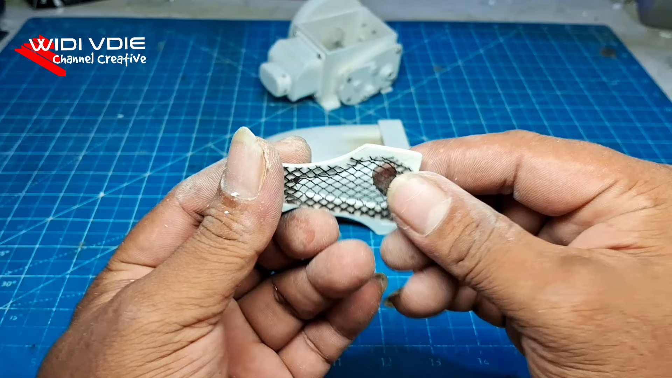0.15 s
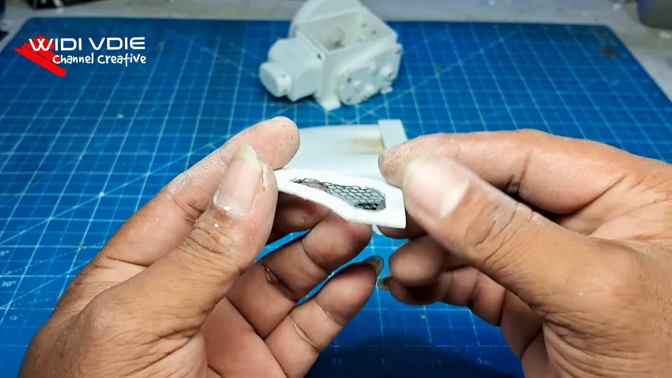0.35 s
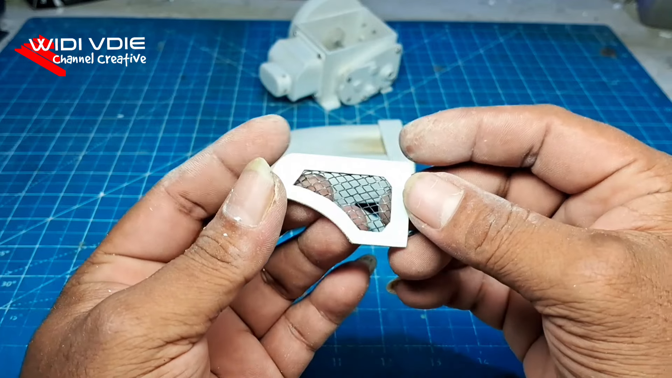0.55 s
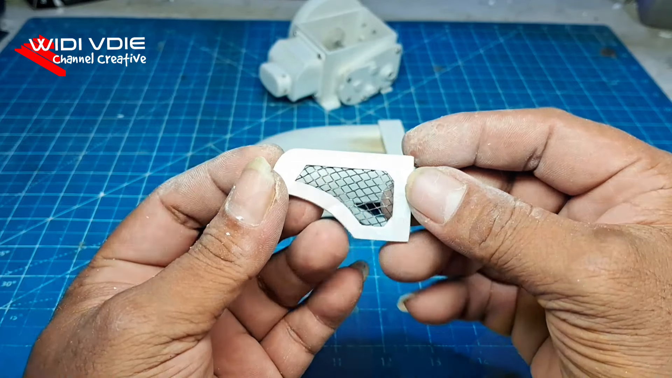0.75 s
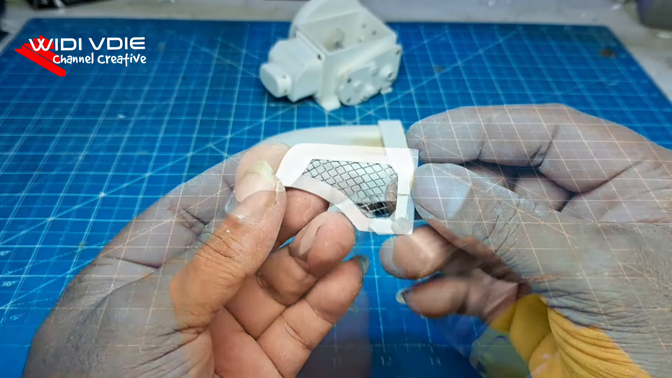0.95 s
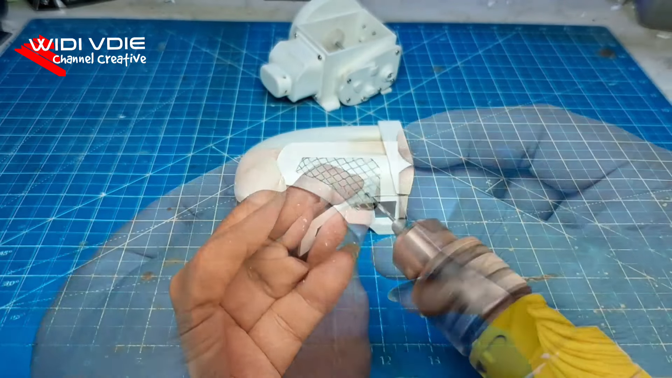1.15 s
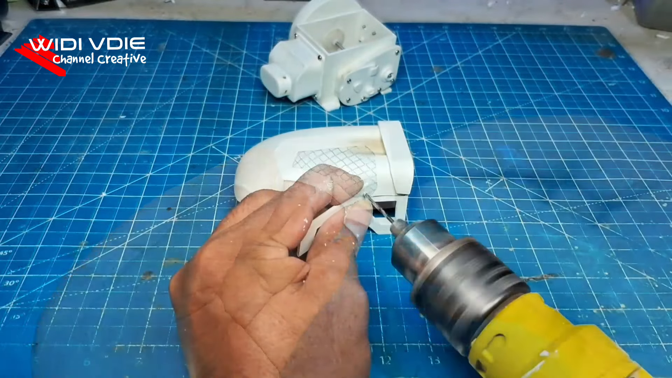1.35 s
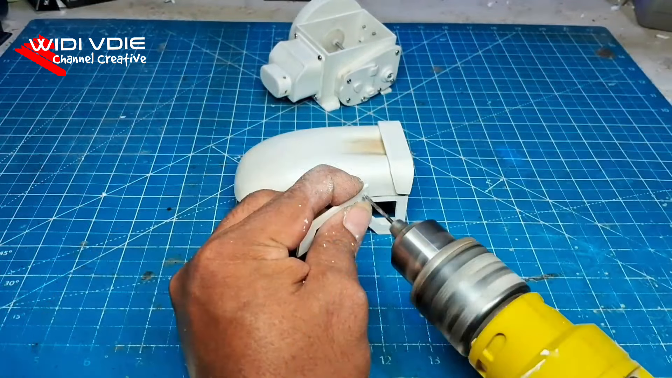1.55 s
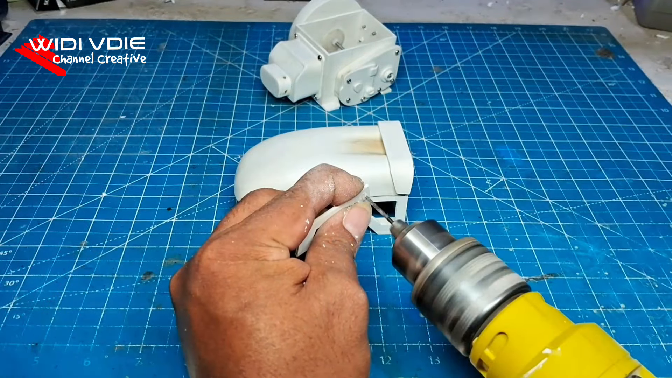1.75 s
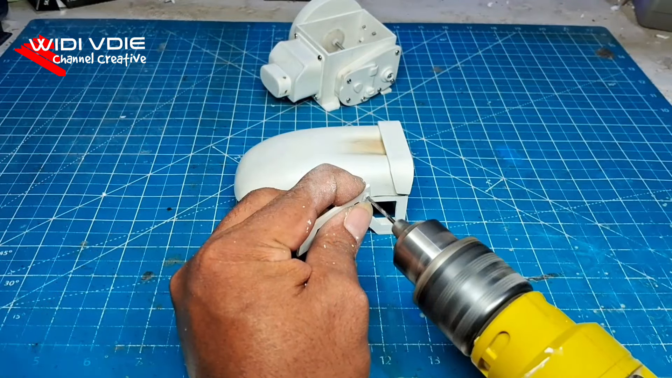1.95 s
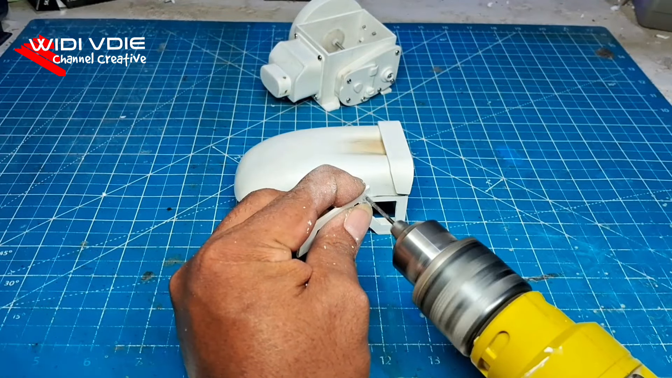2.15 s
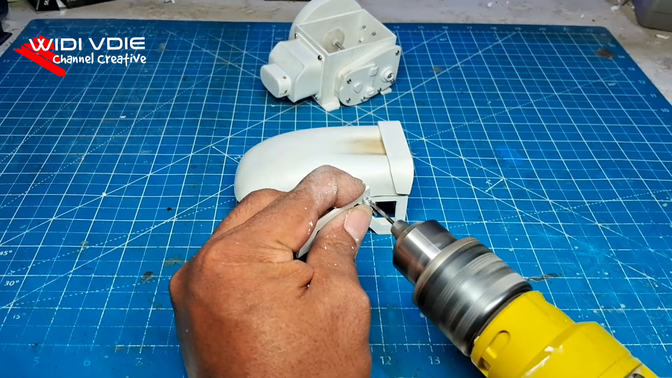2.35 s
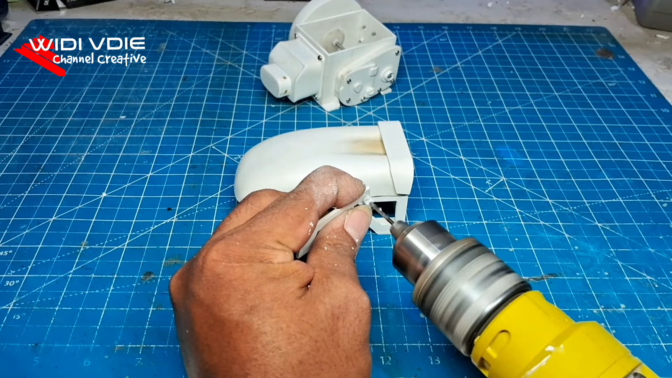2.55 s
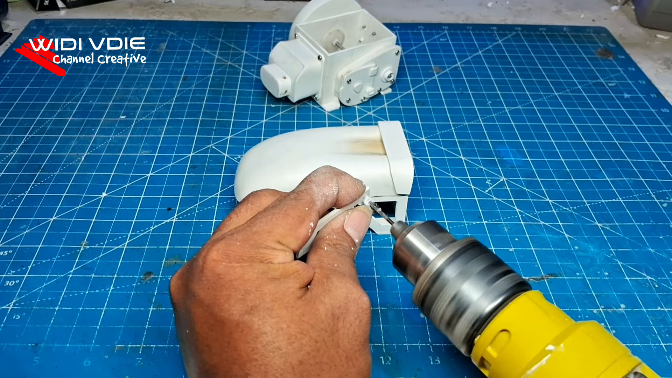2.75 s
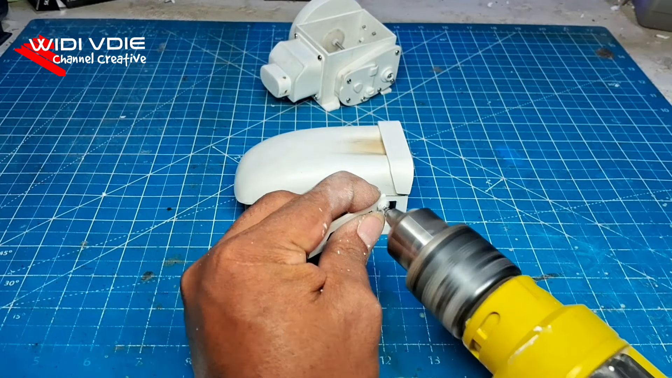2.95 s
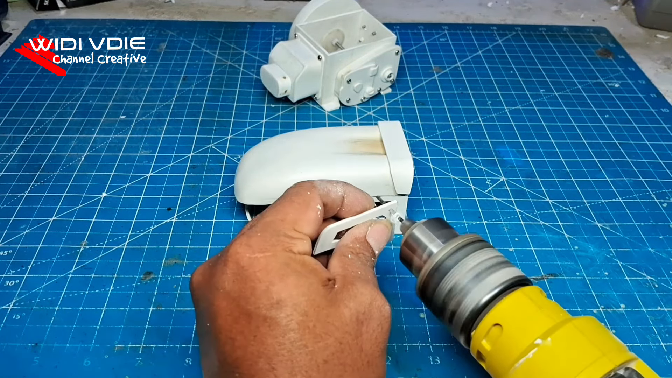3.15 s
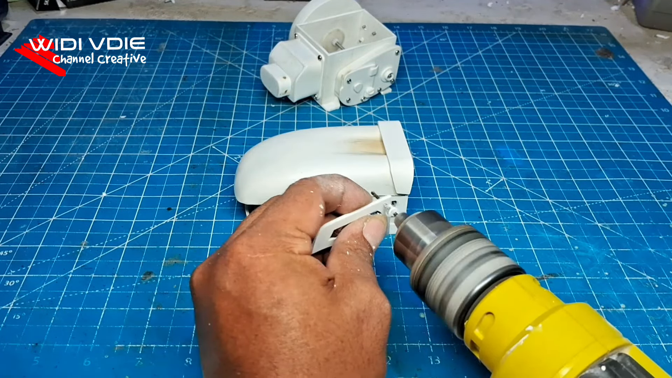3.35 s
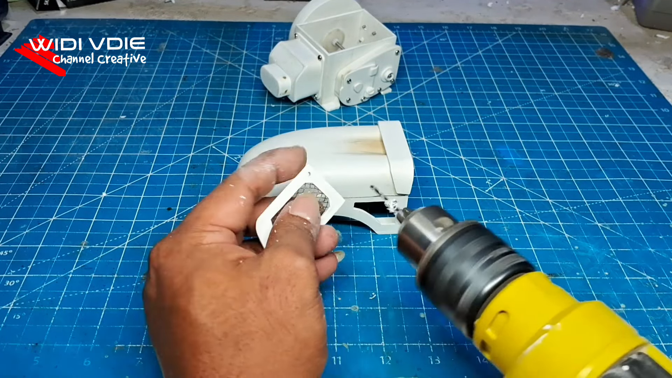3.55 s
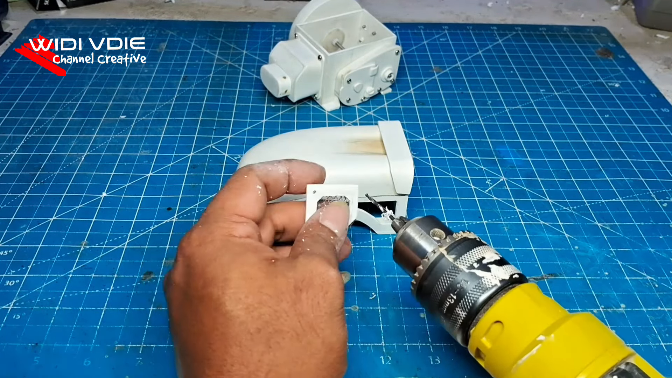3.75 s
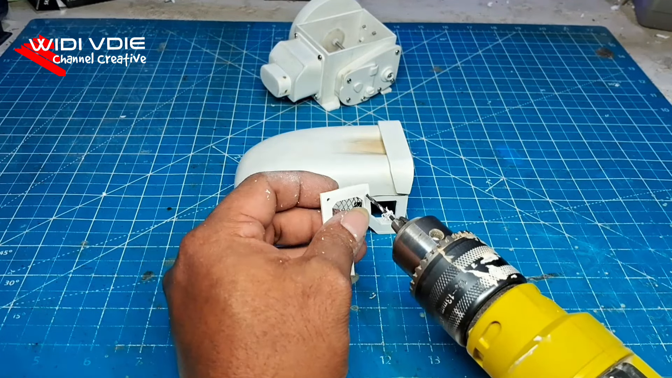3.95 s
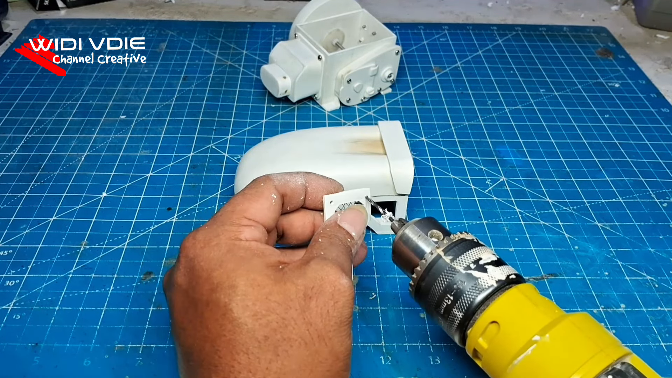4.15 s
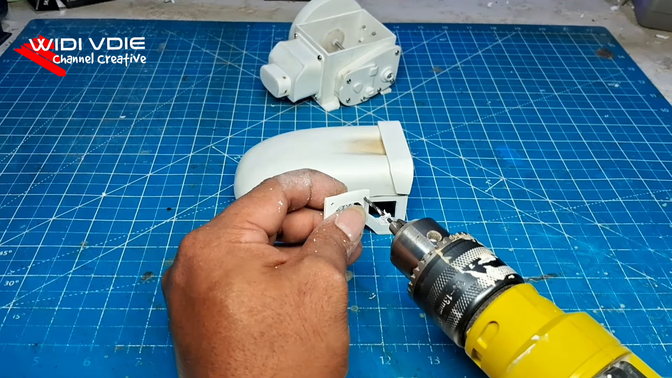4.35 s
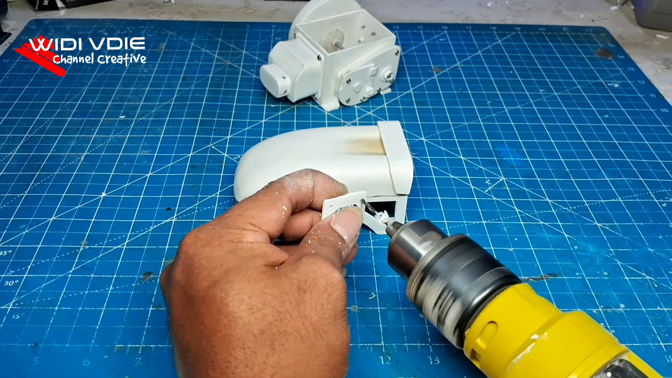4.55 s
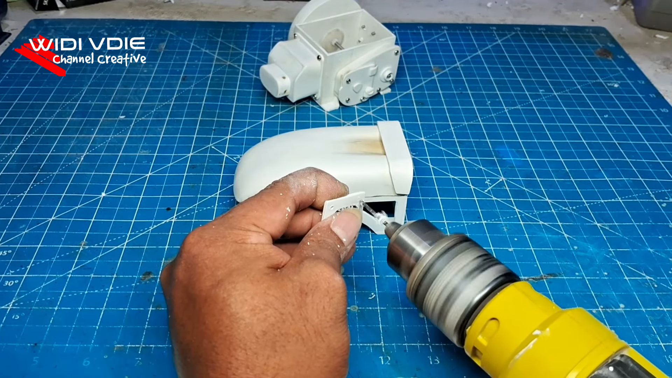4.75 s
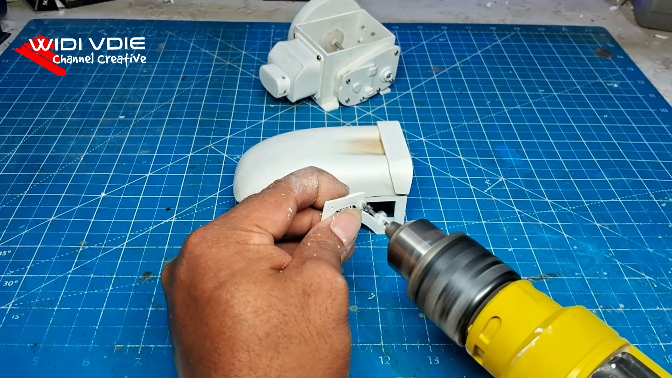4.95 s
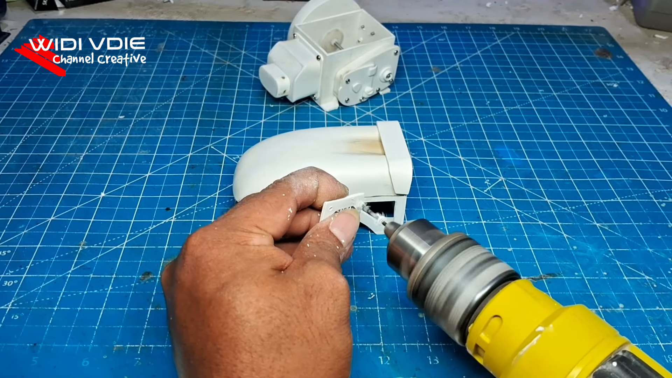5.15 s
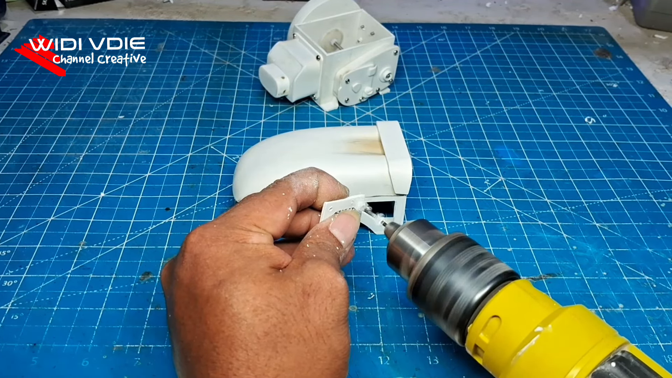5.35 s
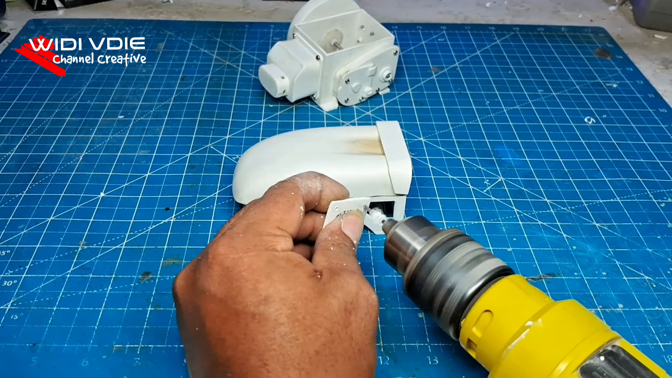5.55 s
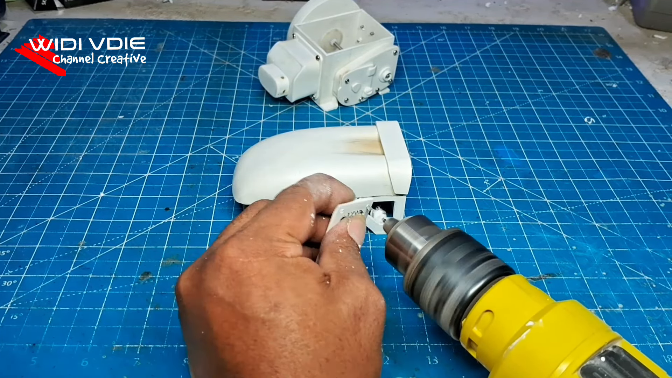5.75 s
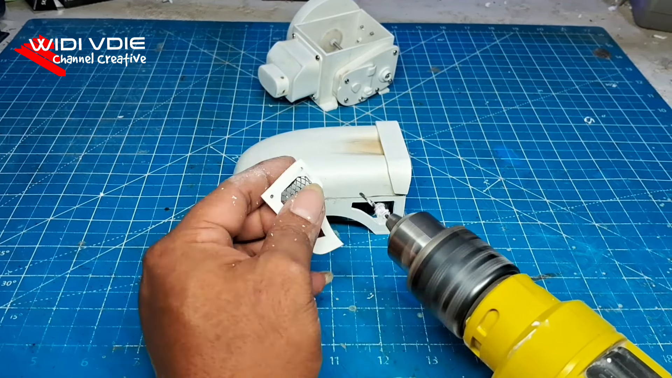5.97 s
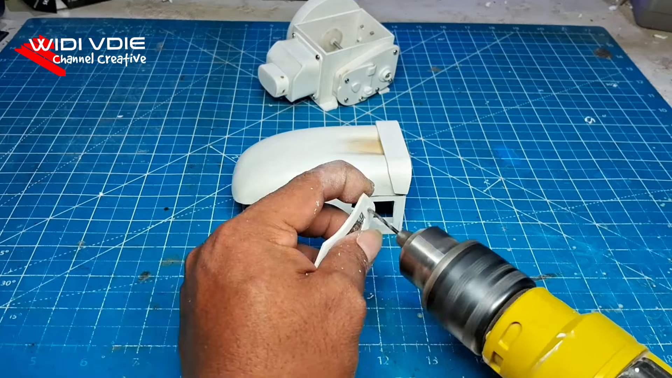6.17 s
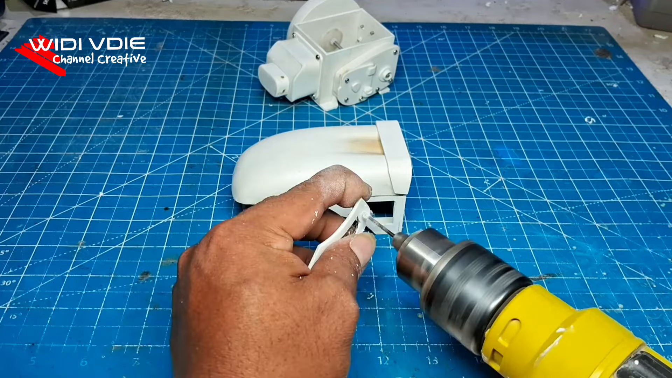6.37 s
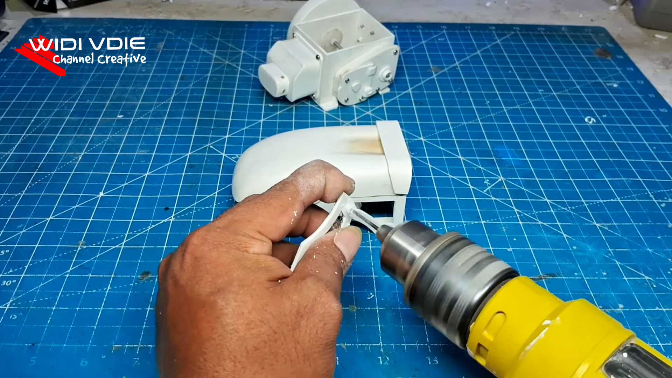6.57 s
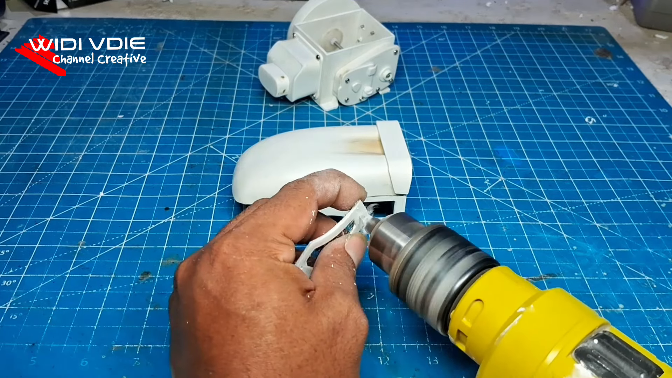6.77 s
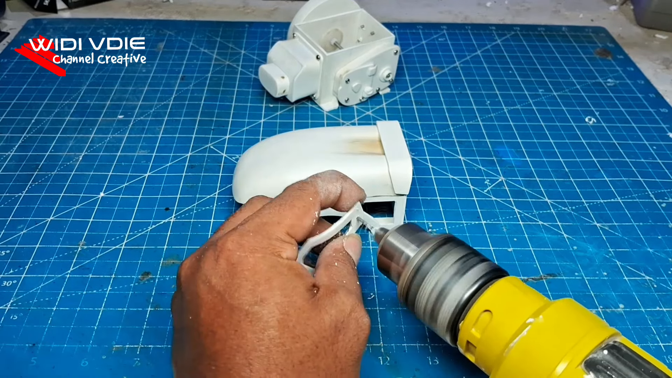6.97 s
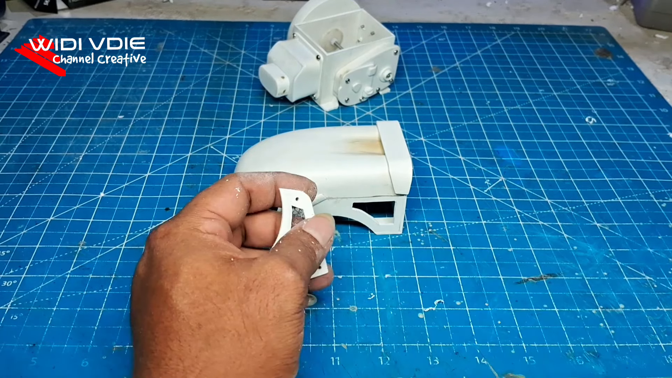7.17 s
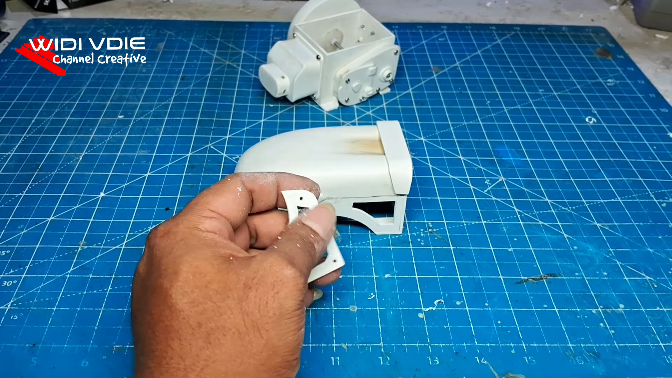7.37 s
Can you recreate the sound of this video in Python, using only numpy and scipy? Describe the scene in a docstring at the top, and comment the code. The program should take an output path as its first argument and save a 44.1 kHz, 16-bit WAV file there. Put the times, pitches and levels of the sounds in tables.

```python
"""At a table with a cutting mat a hand drill bores small plastic parts in three bursts; a far engine idles. The
motor whines on multiples of its shaft speed, the gears rattle in the housing, filtered noise gives rumble,
whirr and fan hiss. Handling adds clicks, table booms and shaking; the whole level dips once. In most of the
third burst drill and engine sound five times fast, their rates and pitches that much higher."""
import sys
import numpy as np
from scipy import signal
from scipy.io import wavfile
from scipy.ndimage import uniform_filter1d

SR = 44100
rng = np.random.default_rng(int(sys.argv[2]) if len(sys.argv) > 2 else 0)


def log_audio(samples):
    """Write samples as a 16-bit WAV file to the path given in sys.argv[1]."""
    # one column per channel
    frames = np.atleast_2d(samples).T
    # limit to full scale, then quantise
    limited = np.clip(frames, -1, 1)
    pcm = np.round(limited * 32767).astype(np.int16)
    wavfile.write(sys.argv[1], SR, pcm)


N = 326781
FAST_START_S, FAST_END_S, PACE = 6.168, 7.197, 5
LAG_SAMPLES = 5  # left ear, at normal pace
CUTOFF_HZ = 15950
REFERENCE_TURNS_PER_S = 180

# Shaft speed goals: quick starts, run-ups, coasting (goal below zero), and a jump to running speed
# where the fast stretch begins. Each row: start in seconds, goal in turns per s before PACE,
# time constant in seconds of the clock that PACE speeds up.
TRIGGER = [(0.712, 14, .004), (0.725, 187.4, .72), (2.816, 184.4, .057), (3.046, 181.4, .02),
           (3.393, -43, .21), (4.54, 36, .003), (4.55, 189.8, .184), (5.375, 184.4, .03),
           (5.538, 191, .056), (5.874, -43, .215), (6.1676, 104.5, .00003), (6.168, 195.8, .61),
           (6.798, 214, 1.4), (7.07, -65, 1.2)]
# Level changes by moment. Each row: time in seconds, dB added to the rumble, to the rattle,
# to the whirr and hiss, to the whine.
LEVEL_CHANGES = [(0.7, 1.1, 0, 2.2, 3.5), (1.5, 3.5, 1, 3.1, -0.7), (1.62, -1, 1.5, 0, -1.5),
                 (2.26, -0.2, 3, 0.1, -1.3), (2.8, 0, -0.7, 1.5, -2.1), (2.95, -8.5, 0, 0.5, 0.5),
                 (3.36, -10.5, -2.5, -2, -1.5), (3.45, 2, -4, -1.4, -2.8), (4.52, -4, -7, -6.5, -8),
                 (4.6, -2.5, 1.5, 4, -7), (4.66, -2, -1.7, 4, -4), (5.0, -5, -3.5, 1, -0.2),
                 (5.25, -3, -2, -2, -0.8), (5.87, -12, -3, -0.1, -0.8), (5.95, -4, 1.5, -0.1, -0.5),
                 (6.1, 3, -1, -0.5, -5), (7.197, 2.5, -3, 2, 6.5), (7.41, 6, -4, 3, 5.5)]
# Whine. Each row: shaft multiple, dB under power at the reference speed, dB coasting at that speed,
# dB gained per doubling of speed.
TONES = [(23, -22, -27, 14), (24, -24.5, -29, -1), (48, -31.5, -35, 3), (72, -27.5, -31, 7),
         (96, -23, -27, 11), (120, -23, -24, 14), (144, -29, -29, 9)]
# Whine let out by the casing. Each row: frequency in Hz, gain in dB.
CASING = [(900, -45), (1800, -22), (2200, -11), (2600, 1), (3800, 0), (4400, 4), (5000, 6), (6400, 0),
          (7200, 5), (8000, 0), (8900, 6), (9900, -1), (11000, 2), (12200, -1), (13500, 4), (15900, 2)]
# Weaker multiples. Each row: shaft multiple, index of the level column it follows.
SIDEBANDS = [(25, 1), (46, 0), (47, 0), (49, 0), (50, 0), (51, 0), (52, 0), (69, 0), (73, 3), (95, 4),
             (168, 6), (192, 6), (12, 0)]
FAST_SIDEBANDS = [(11.5, 0), (12.5, 0), (23, 1)]
# Their levels. Each entry: dB relative to the column followed.
SIDEBANDS_DB = [-12, -8, -17, -14, -16, -17, -17, -14, -11, -11, -2, -3, -19]
FAST_SIDEBANDS_DB = [-3, -2, -5]
# Whine in the fast stretch. Each row: time in seconds, dB of shaft multiples 12, 24 and 2.57.
FAST_SPIN = [(6.168, -45, -23, -48), (6.24, -46, -27, -48), (6.37, -32, -65, -42), (6.57, -29, -65, -32),
             (7.0, -29, -65, -30), (7.08, -35, -45, -31), (7.13, -60, -23, -55), (7.197, -65, -23, -65)]
# Low gear tone at 2.6 times the shaft speed, two spells. Each row: time in seconds, level in dB.
GEAR_TONE = [
    [(2.3, -52), (2.9, -48), (3.39, -49)],
    [(5.0, -50), (5.24, -30.5), (5.32, -50), (5.55, -47), (5.62, -28), (5.87, -30.5)],
]
# Housing resonances. Each row: frequency in Hz and width in Hz before the caller's scaling, relative dB.
HOUSING = [(1427, 43, -8), (1529, 47, -0.5), (1582, 58, 0), (1774, 93, -8)]
# Drill noise by shaft speed. Each row: turns per s, rumble dB, gear rattle dB, whirr dB, fan hiss dB.
POWERED = [(6, -60, -80, -62, -85), (13, -31, -39, -45, -49), (22, -29.5, -42, -35, -48),
           (35, -28, -38, -32.5, -35.5), (60, -26.5, -35, -26.5, -28.5), (91, -26.5, -27, -22, -20),
           (132, -29.5, -22, -19.5, -19.5), (187, -29.5, -21.5, -16, -19.5)]
COASTING = [(14, -70, -90, -85, -90), (24, -60, -69, -71, -60), (38.8, -50, -58, -36, -35),
            (60.4, -43, -41, -25.5, -30), (118, -38, -30.5, -23, -17.5), (190, -25, -19.5, -15.5, -20.5)]
# Drill noise in the fast stretch. Each row: time in seconds, rumble dB, gear rattle dB, whirr dB, hiss dB.
FAST_NOISE = [(6.168, -22.5, -41, -28, -20.5), (6.191, -24, -24, -26, -17.5),
              (6.279, -23, -18, -21.5, -16.5), (6.5, -31.5, -17.5, -23.5, -16),
              (6.87, -31, -17, -21.5, -16.5), (6.99, -28, -18.5, -20, -13.5), (7.085, -31, -17, -24, -18),
              (7.163, -36, -35, -27.5, -22), (7.197, -32, -36, -33, -28)]
# Noise colours. Each row: frequency in Hz, relative density in dB per Hz.
RUMBLE = [(88, -40), (150, -5.5), (254, 0), (432, 1), (476, 6), (619, 1.5), (741, -19.5), (900, -12),
          (1170, -46), (1980, -120)]
WHIRR = [(350, -33), (600, -14.5), (877, -14), (1200, -7.5), (1510, -9), (2040, -7), (3020, -11.5),
         (3470, -6.5), (5070, -8.5), (6230, -12), (8000, -9.5), (10400, -59), (17600, -120)]
HISS = [(3530, -35), (6000, -5), (7470, -7), (8100, -3), (8650, 5), (9530, -1), (13300, 7.5), (15800, -6.5)]
FAST_RUMBLE = [(190, -25), (330, -9), (539, -10), (592, -6), (793, -17), (1040, -8), (1410, -2.5),
               (2500, 5.5), (4000, -3.5), (5200, -33), (8800, -120)]
FAST_WHIRR = [(2060, -26), (3500, 6.5), (3760, -19.5), (4930, 3.5), (5900, -0.5), (7390, -19), (9500, -19),
              (12400, -39), (20900, -120)]
FAST_HISS = [(5000, -18), (8500, 12.5), (9410, -6), (12700, 3.5), (14000, -3), (15200, -5), (15800, -19)]
SHAKE_COLOUR = [(30, -30), (44, -9), (52, -13), (95, 3), (150, 0.5), (200, -16)]
AIR = [(82, -44), (140, -9.5), (269, -22), (315, -13), (334, -19.5), (407, -7), (468, -13.5), (538, -11.5),
       (630, -23.5), (1210, -24.5), (1310, -26), (1420, -23), (2320, -24.5), (2570, -21.5), (15800, -53.5)]
# Stereo noise. Each row: frequency in Hz, left-right likeness.
LIKENESS = [(60, .05), (150, 0.47), (300, 1), (1000, 0.19), (3000, 0.059), (8000, 0.064), (15000, 0.11)]
# Stereo noise. Each row: frequency in Hz, left minus right in dB.
LEAN = [(60, -5), (150, -1), (380, -2), (950, 0.5), (2380, -2.5), (5980, -0.5), (15000, -7)]
# Trigger and part clicks. Each row: start in seconds, crack peak in dB, dullness 0-1.
CLICKS = [(0.757, -17, .1), (1.098, -11, .6), (3.6983, -40, .9), (4.4144, -21, .5), (4.548, -26, .3),
          (7.2525, -16, .6), (7.3047, -13, .5), (7.3563, -9, .6), (7.3876, -7.5, .65)]
# Ringing plastic. Each row: frequency in Hz, relative dB, 60 dB decay in seconds.
PLASTIC = [(650, -16.5, .03), (1420, -18.5, 0.066), (1600, 3, 0.039), (3273, -6, .015), (4786, -12, .012),
           (6200, -8, 0.012), (7600, 3, .01)]
# Bumps on the table. Each row: start in seconds, level in dB, lower pitch in Hz,
# 60 dB decay in seconds for a 120 Hz boom (shorter in proportion for higher pitch).
BUMPS = [(1.269, -23, 94.2, 0.12), (1.359, -10, 238, 0.092), (1.623, -14.5, 97, 0.1),
         (3.422, -2.5, 170, 0.048), (3.439, -15, 125, 0.12), (3.849, -10.5, 148, 0.06),
         (3.911, -13, 133, 0.11), (6.541, -11, 466, 0.062), (6.578, -15, 508, 0.18),
         (7.037, -20, 594, 0.12), (7.059, -16, 460, 0.17)]
# Hands shaking the table. Each row: peak time in seconds, peak dB, rise and fall in seconds per 20 dB.
SHAKE = [(0.0, -39, .1, -2), (1.1, -36, .7, -2), (1.36, -25, 0.2, 0.3), (1.65, -35.5, .3, -0.3),
         (3.09, -40, 0.22, 0.2), (3.45, -36, 0.088, 0.2), (3.88, -27, .07, 0.08), (4.36, -45, .6, 0.1),
         (4.67, -40, .4, .3), (6.02, -46, 0.22, 0), (7.25, -48, .12, .8)]
# Engine cycle rate. Each row: time in seconds, cycles per s before PACE.
CYCLES_PER_S = [(0, 13.14), (2.8, 13.14), (2.85, 13.2), (7.41, 13.2)]
# Engine tones. Each row: multiple of the cycle rate, relative dB.
ENGINE = [(4, -50), (5, -53), (6, -50), (7, -52), (8, -57), (9, -48), (10, -54), (11, -50), (12, -52),
          (13, -46), (14, -49), (15, -48), (16, -43), (17, -51), (18, -51), (19, -43), (20, -44), (21, -60),
          (22, -50), (23, -55), (28, -52), (29, -49), (31, -47), (32, -52), (33, -51), (34, -56), (35, -52),
          (36, -50), (39, -50), (40, -53)]
# Engine and room. Each row: time in seconds, engine level dB, dB added to multiples under 10, room air dB.
IDLE = [(0, 1.5, 0, -36.5), (.7, 1.5, 0, -36.5), (1.2, -0.5, 6, -43), (2.8, -12.5, 9, -43),
        (2.85, -9, -12, -34), (3.4, -11, -14, -45), (3.7, -2.5, -15, -39.5), (4.5, -1, -15, -37.5),
        (4.7, -8, -17, -45.5), (6.16, -4.5, -30, -36.5), (6.17, 3, 0.5, -69), (7.195, 0, -2, -71),
        (7.2, 0.5, 0, -31), (7.41, -3, -3, -38)]
# Dip of the whole level. Entries: start in seconds, starting gain in dB, recovery in seconds.
DROPOUT = (2.7992, -27, 0.018)


def amp(db):
    """dB to gain."""
    return 10 ** (np.asarray(db) / 20)


def rms_one(x):
    """Scaled to rms 1."""
    return x / np.sqrt(np.mean(x ** 2) + 1e-20)


def in_time(tables, silent):
    """Columns of the tables at every sample; the value silent outside them."""
    t = np.arange(N) / SR
    out = np.full((len(tables[0][0]) - 1, N), float(silent))
    for rows in tables:
        s, *columns = np.transpose(rows)
        on = (t >= s[0]) & (t <= s[-1])
        out[:, on] = [np.interp(t[on], s, c) for c in columns]
    return out


def at_hz(points, hz):
    """Two-column table interpolated on a log axis."""
    x, y = np.array(points)[:, 0], np.array(points)[:, 1]
    return np.interp(np.log(hz), np.log(x), y)


def drift(rate_hz):
    """Slow random signal of rms 1: noise at SR / 40 through a two-pole low-pass."""
    r = np.exp(-80 * np.pi * rate_hz / SR)
    white = rng.standard_normal(N // 40 + 2002)
    slow = signal.lfilter([1], [1, -2 * r, r * r], white)[2000:]
    return np.interp(np.arange(N) / 40, np.arange(len(slow)), rms_one(slow))


def ring(x, hz, width_hz):
    """Two-pole resonator: a unit click starts a decaying sine of height 1."""
    r, w = np.exp(-np.pi * width_hz / SR), 2 * np.pi * hz / SR
    return signal.lfilter([0, np.sin(w)], [1, -2 * r * np.cos(w), r * r], x + 1e-18)


def shaft():
    """Speed before PACE, closing in exponentially on each new goal, and smoothed power on/off."""
    t = np.arange(N + 1) / SR
    lived_s = t + (PACE - 1) * np.clip(t - FAST_START_S, 0, FAST_END_S - FAST_START_S)
    speed, powered = np.zeros(N + 1), np.zeros(N + 1, bool)
    starts = [int(s * SR) for s, _, _ in TRIGGER] + [N]
    for (_, goal, lag_s), a, b in zip(TRIGGER, starts, starts[1:]):
        remaining = np.exp((lived_s[a] - lived_s[a:b + 1]) / lag_s)
        speed[a:b + 1] = np.maximum(goal + (speed[a] - goal) * remaining, 0)
        powered[a:b] = goal > 0
    return speed[:N], uniform_filter1d(1. * powered[:N], size=600)


def tone_levels(speed, power):
    """Whine levels in dB: each multiple has its own slope with speed and its own coasting level."""
    _, on_db, off_db, slope_db = np.transpose(TONES)[:, :, None]
    octaves = np.log2((speed + .01) / REFERENCE_TURNS_PER_S)
    level_db = power * on_db + (1 - power) * off_db + slope_db * octaves
    return np.where(speed > 8, level_db, -120)


def whine(turns_per_s, levels_db, multiples, sidebands, sidebands_db, waver_db, sway, casing=None):
    """Sines on shaft multiples; standing waves swing each from side to side, a quarter cycle apart."""
    on = np.flatnonzero(levels_db[0] > -100)
    few = on[::16]  # control points
    turns = np.cumsum(turns_per_s[on] * (1 + .001 * drift(40)[on])) / SR
    lines = [(m, k, 0) for k, m in enumerate(multiples)]
    lines += [(*s, db) for s, db in zip(sidebands, sidebands_db)]
    out = np.zeros((2, N))
    for multiple, column, relative_db in lines:
        hz = multiple * turns_per_s[few]
        casing_db = at_hz(casing, hz) if casing else 0
        line_db = levels_db[column][few] + relative_db + casing_db + waver_db * drift(18)[few]
        level = 2 * amp(line_db) * (hz < CUTOFF_HZ)
        angle = 1.0 + sway * drift(4)[few]
        phase = 2 * np.pi * (multiple * turns + rng.random())
        sides = level * [np.cos(angle), np.sin(angle)]
        left, right = np.repeat(sides, 16, axis=1)[:, :len(on)]
        out[:, on] += [left * np.sin(phase), right * np.cos(phase)]
    return out


def walls(x, echo_db):
    """A few wall echoes, crossing sides; they blur fast glides and let steady tones swell and cancel."""
    out = x.copy()
    for k, lag_s in enumerate([.011, .019, .031, .044, .062]):
        lag = int(lag_s * SR)
        out[:, lag:] += (-1) ** k * amp(echo_db - 90 * lag_s) * x[::-1, :-lag]
    return out


def gear_rattle(level_db, knocks_per_s, pace, spread_db, widen):
    """Loose teeth knock at random and ring the housing; pace scales knock rate, pitch and width."""
    knocking = rng.random(N) < knocks_per_s * pace / SR
    sizes = amp(spread_db * np.minimum(rng.exponential(1, N), 4)) * knocking
    common = sizes * rng.choice([-1, 1], N)
    out = []
    for side in range(2):
        knocks = common + .5 * np.roll(common, 300 + 170 * side)  # table echo, other on each side
        modes = [amp(db) * (-1) ** k * ring(knocks, hz * pace, width_hz * pace * widen)
                 for k, (hz, width_hz, db) in enumerate(HOUSING)]
        out.append(sum(modes))
    return amp(level_db) * rms_one(np.array(out))


def drill_noise(speed, power):
    """Rumble, rattle, whirr and hiss dB follow the speed, one way under power, another coasting."""
    on_db, off_db = [np.array([at_hz(np.array(rows)[:, [0, k]], speed + .01) for k in range(1, 5)])
                     for rows in (POWERED, COASTING)]
    return power * on_db + (1 - power) * off_db


def banded_noise(layers, patchy_db, wobble, pace):
    """Third-octave stereo noise bands, each with the summed power of all (colour, level dB) layers."""
    edges = 40 * 2 ** np.arange(-1 / 3, 9.1, 1 / 3)
    mids, widths = np.sqrt(edges[1:] * edges[:-1]), np.diff(edges)
    white, out, step = rng.standard_normal((2, 2, N)), 0, 32
    shares = []
    for colour, level_db in layers:
        inside = (mids > colour[0][0]) & (mids < 1.2 * colour[-1][0])
        power = amp(2 * at_hz(colour, mids)) * widths * inside
        shares.append(np.outer(power / power.sum(), amp(2 * level_db[::step])))
    gains = np.sqrt(sum(shares))
    for k, hz in enumerate(mids):
        band = signal.butter(2, edges[k:k + 2], "band", fs=SR, output="sos")
        mid, side = signal.sosfilt(band, white[k % 2]) * np.sqrt(SR / 4 / widths[k])
        alike = np.where(pace > 1, *np.clip(at_hz(LIKENESS, [hz / PACE, hz]), 0, 1))
        gain = np.repeat(gains[k], step)[:N] * amp(patchy_db * drift(16.0))
        if hz > 700:
            gain = gain * wobble
        lean = amp(at_hz(LEAN, hz) / 2 * np.array([[1], [-1]]))
        stereo = np.sqrt(1 + alike) * mid + np.sqrt(1 - alike) * side * [[1], [-1]]
        out = out + gain * lean * stereo
    return out


def clicks():
    """A short crack of noise, dulled by a soft contact, plus the ringing of the plastic."""
    hits = np.zeros(N)
    cracks = rng.standard_normal((len(CLICKS), 300)) * np.exp(-np.arange(300) / 110)
    for (s, db, dull), crack in zip(CLICKS, cracks):
        dull = np.clip(dull, 0, .95)
        crack = signal.lfilter([1], [1, -dull], crack)
        hits[int(s * SR):][:300] += amp(db) * crack / np.abs(crack).max()
    rings = sum(amp(db - 29) * ring(hits, hz, np.log(1000) / np.pi / max(t60_s, .005))
                for hz, db, t60_s in PLASTIC)
    return signal.sosfilt(signal.butter(2, 300, "high", fs=SR, output="sos"), hits + rings)


def bumps():
    """Soft pushes set the table top booming on two close pitches."""
    out = np.zeros(N)
    for s, db, hz, decay_s in BUMPS:
        t = np.arange(min(int(.3 * SR), N - int(s * SR))) / SR
        boom = np.sin(2 * np.pi * hz * t) + 0.61 * np.sin(2 * np.pi * 1.29 * hz * t)
        decay = amp(db - 60 * t * hz / 120 / max(decay_s, .02))
        out[int(s * SR):][:len(t)] += decay * (1 - np.exp(-t * hz)) * boom
    return out


def shake():
    """Level in dB of the table shaking: each jolt swells and dies away, the loudest one counts."""
    t = np.arange(N) / SR
    jolts = []
    for s, db, rise_s, fall_s in SHAKE:
        drop = np.where(t < s, (s - t) / max(rise_s, .01), (t - s) / max(fall_s, .01))
        jolts.append(db - 20 * drop)
    return np.max(jolts, axis=0)


def engine(cycles_per_s, level_db, bass_db):
    """The firing pattern returns every cycle: sines on multiples of the cycle rate, wavering in level."""
    cycles, out = np.cumsum(cycles_per_s) / SR, np.zeros((2, N))
    for multiple, db in ENGINE:
        low_db, lean_db, waver_db = (bass_db, -2.5, 2.6) if multiple < 10 else (0, -.7, 1.2)
        phase = 2 * np.pi * rng.random() + .6 * rng.standard_normal((2, 1))
        gain = amp(db + low_db + waver_db * drift(3) + [[lean_db], [-lean_db]])
        out += gain * np.sin(2 * np.pi * multiple * cycles + phase)
    return np.sqrt(2) * amp(level_db) * out


def scene():
    """Drill, handling, engine and room air; the left side hears all but the whine a little late."""
    t = np.arange(N) / SR
    fast = (t >= FAST_START_S) & (t < FAST_END_S)
    pace = np.where(fast, PACE, 1)
    speed, power = shaft()
    turns_per_s = pace * speed
    change_db = in_time([LEVEL_CHANGES], 0)

    tones_db = np.where(fast, -120, tone_levels(speed, power) + change_db[3])
    motor = whine(turns_per_s, tones_db, [row[0] for row in TONES], SIDEBANDS, SIDEBANDS_DB,
                  waver_db=3.4, sway=.3, casing=CASING)
    motor += whine(turns_per_s, in_time(GEAR_TONE, -120), [2.6], [], [], waver_db=1.5, sway=.1)
    fast_motor = whine(turns_per_s, in_time([FAST_SPIN], -120), [12, 24, 2.57],
                       FAST_SIDEBANDS, FAST_SIDEBANDS_DB, waver_db=1.2, sway=.15)

    drill_db = drill_noise(speed, power) + change_db[[0, 1, 2, 2]]
    rumble_db, rattle_db, whirr_db, hiss_db = np.where(fast, -120, drill_db)
    fast_rumble_db, fast_rattle_db, fast_whirr_db, fast_hiss_db = in_time([FAST_NOISE], -120)
    gears = gear_rattle(rattle_db, 750, 0.97, spread_db=4.5, widen=1.57)
    gears += gear_rattle(fast_rattle_db, 400, PACE, spread_db=3.0, widen=2.2)

    # noise beats once per shaft turn and flutters at random
    turns = np.cumsum(turns_per_s) / SR
    flutter = amp(0.34 * drift(27) + 1.55 * drift(3.5))
    wobble = (1 + 0.15 * np.sin(2 * np.pi * turns)) * flutter
    idle_db, bass_db, air_db = in_time([IDLE], 0)
    shake_db = np.where(fast, -120, shake())
    layers = [(RUMBLE, rumble_db), (WHIRR, whirr_db), (HISS, hiss_db), (FAST_RUMBLE, fast_rumble_db),
              (FAST_WHIRR, fast_whirr_db), (FAST_HISS, fast_hiss_db), (AIR, air_db),
              (SHAKE_COLOUR, shake_db)]
    noise = banded_noise(layers, patchy_db=1.29, wobble=wobble, pace=pace)

    handling = bumps() * amp([[-4.5], [2.5]]) + clicks()
    far_engine = engine(pace * in_time([CYCLES_PER_S], 0)[0], idle_db, bass_db)
    left, right = noise + gears + far_engine + handling
    late = np.maximum(np.arange(N) - LAG_SAMPLES // pace, 0)
    mix = np.array([left[late], right]) + walls(motor, echo_db=-8) + fast_motor

    dip_s, depth_db, recovery_s = DROPOUT
    dip = np.where(t < dip_s, 1, np.clip(amp(depth_db) + (t - dip_s) / recovery_s, 0, 1))
    return dip * mix


def record(dry):
    """Soft saturation rounds the peaks, a steep low-pass cuts the top."""
    steep = signal.ellip(16, .5, 68, CUTOFF_HZ, fs=SR, output="sos")
    return signal.sosfilt(steep, 1.007 * np.tanh(dry / 1.122))


dry = scene()
out = record(dry)
log_audio(out)
```